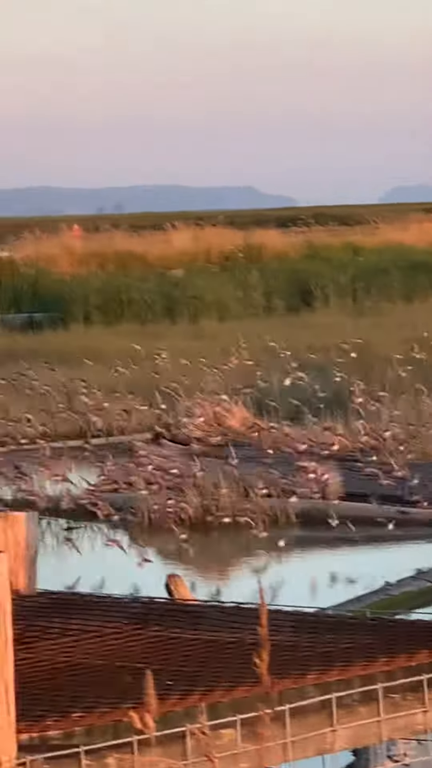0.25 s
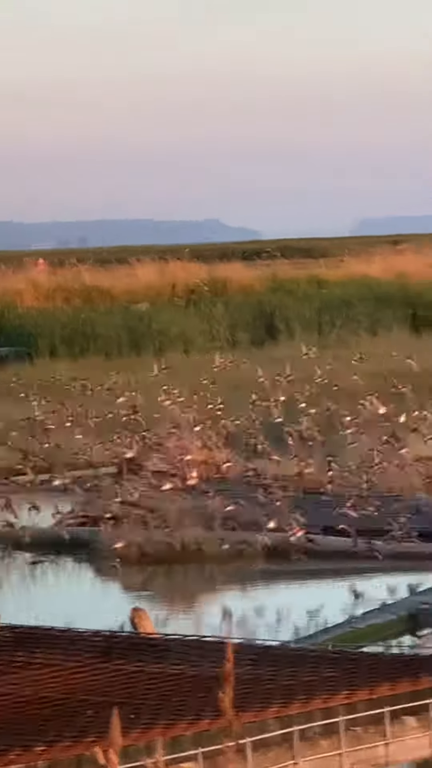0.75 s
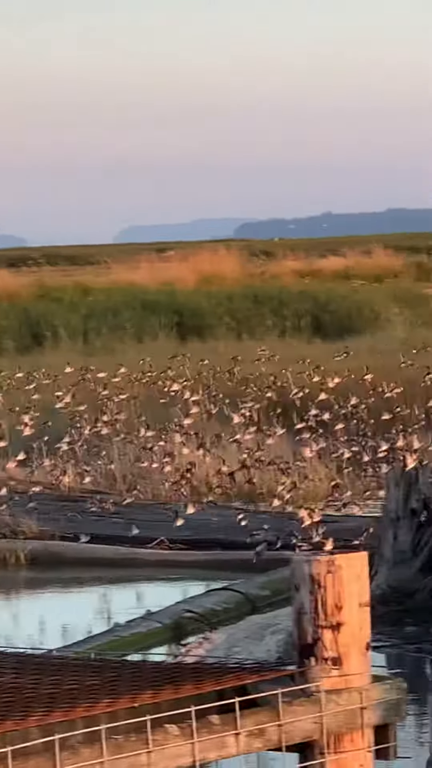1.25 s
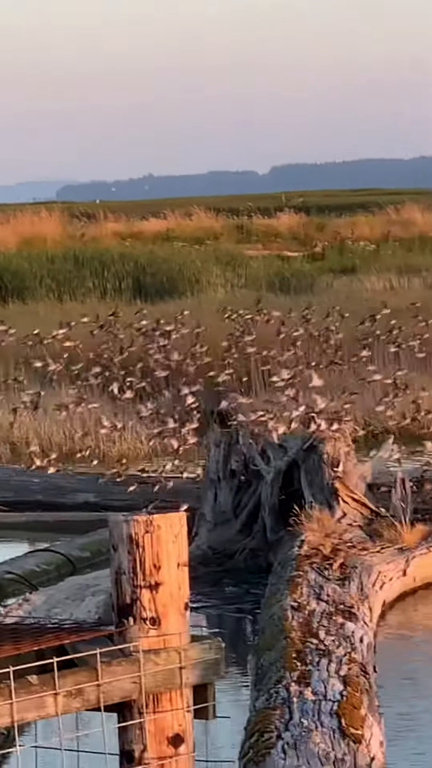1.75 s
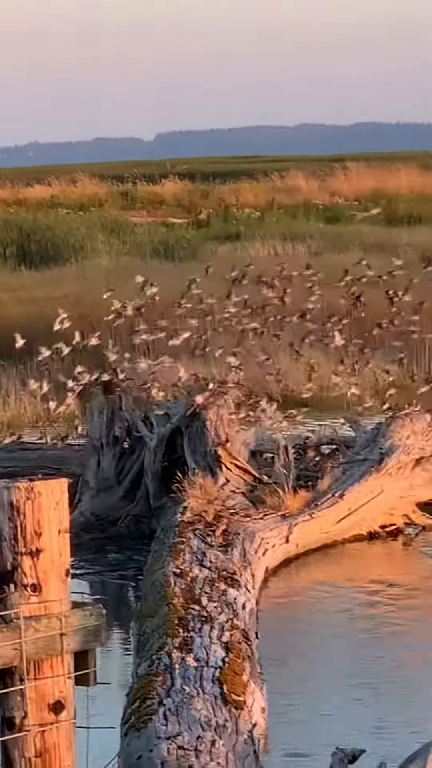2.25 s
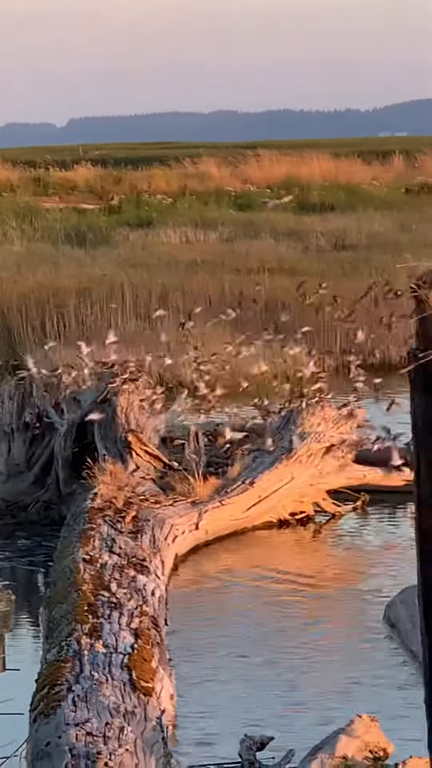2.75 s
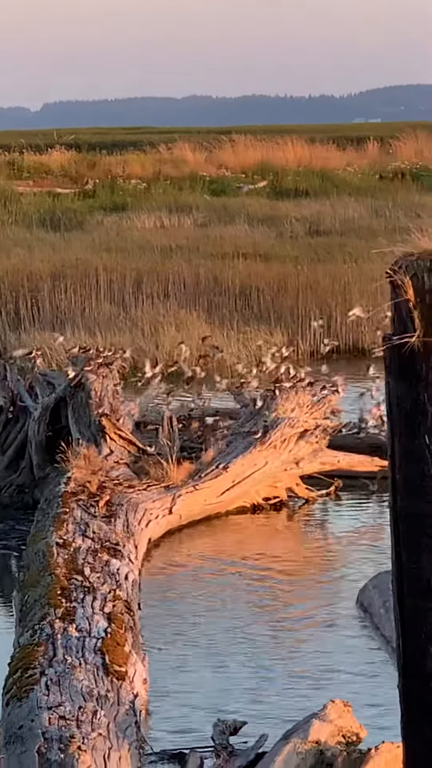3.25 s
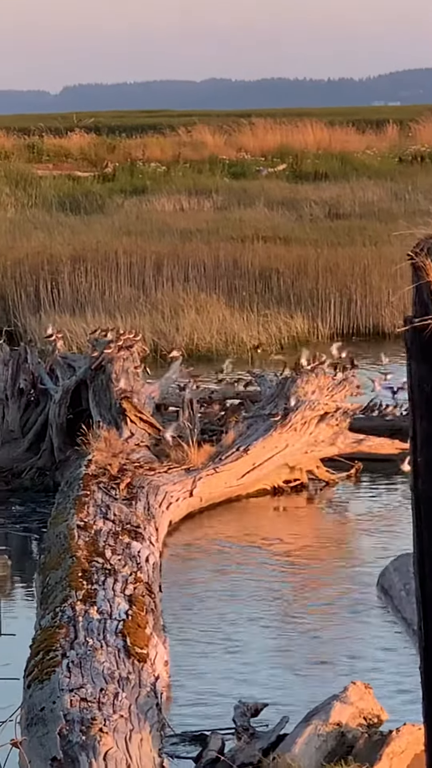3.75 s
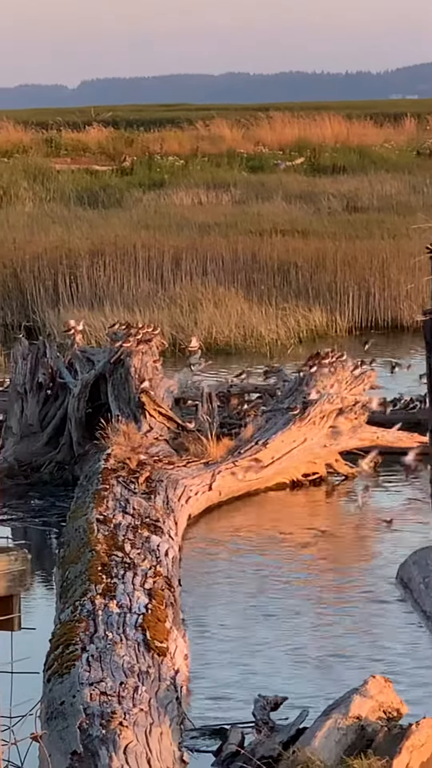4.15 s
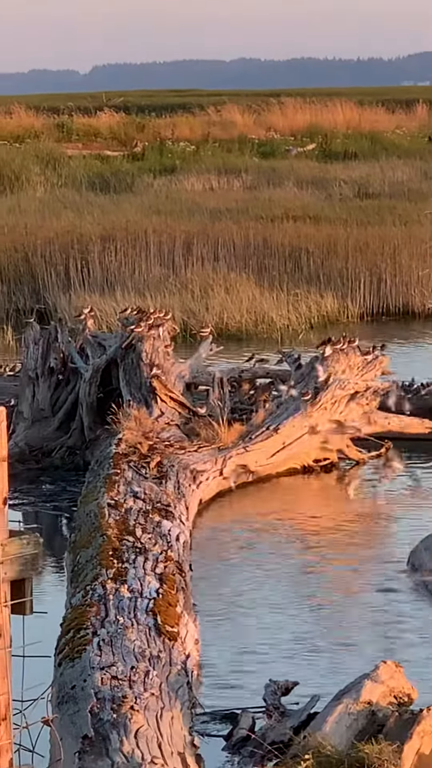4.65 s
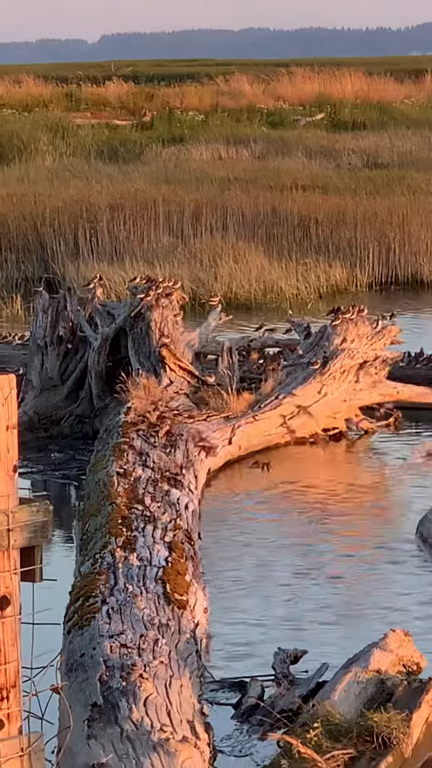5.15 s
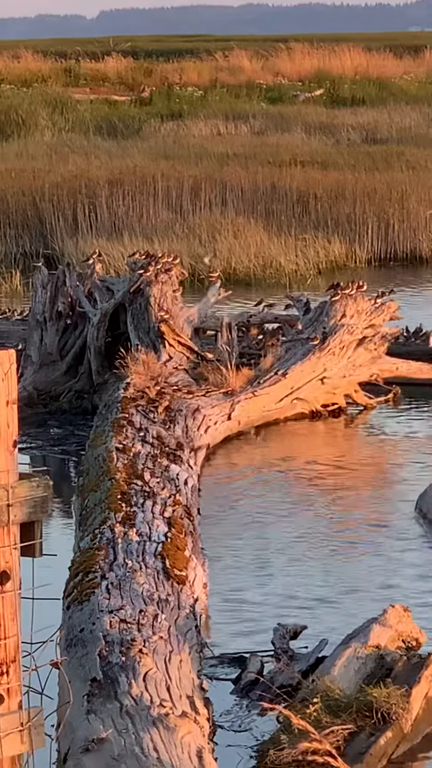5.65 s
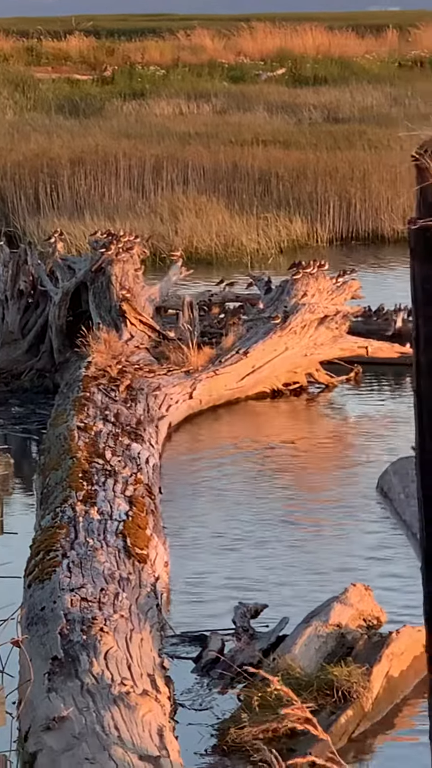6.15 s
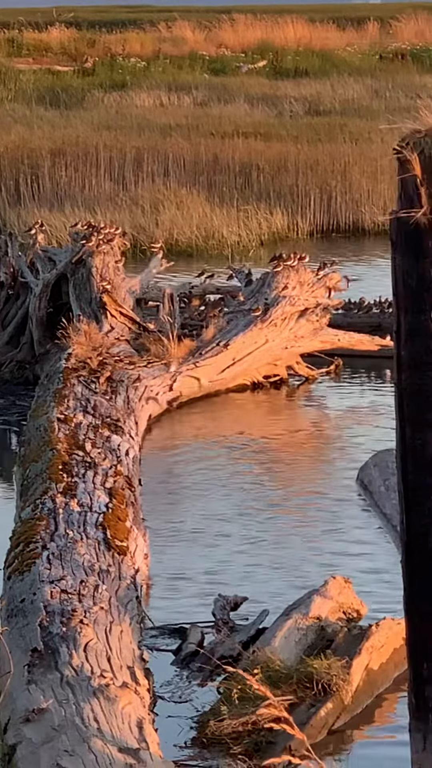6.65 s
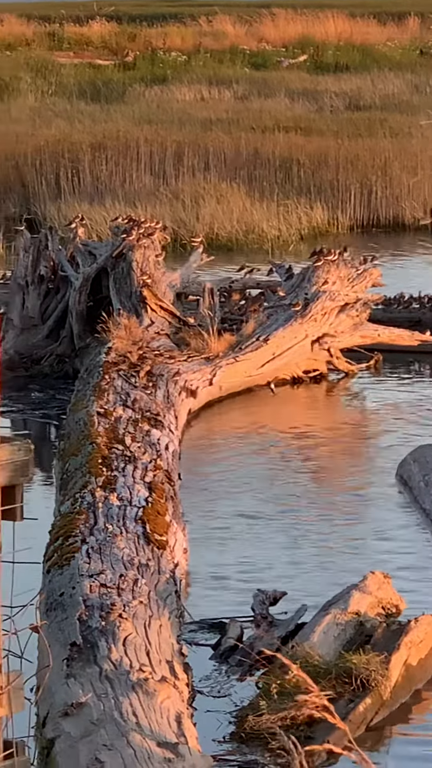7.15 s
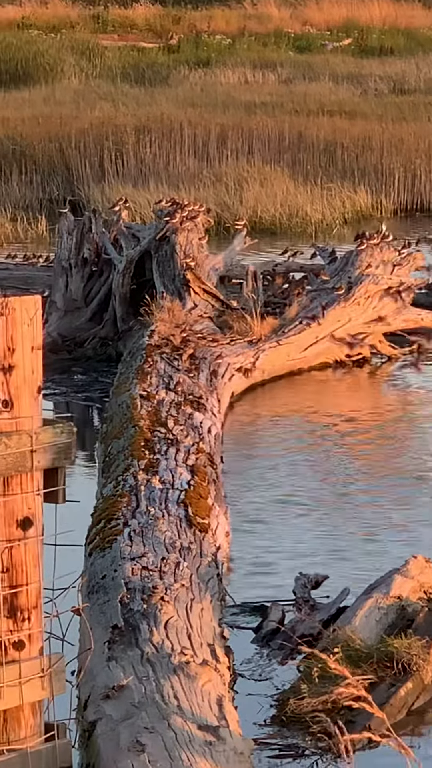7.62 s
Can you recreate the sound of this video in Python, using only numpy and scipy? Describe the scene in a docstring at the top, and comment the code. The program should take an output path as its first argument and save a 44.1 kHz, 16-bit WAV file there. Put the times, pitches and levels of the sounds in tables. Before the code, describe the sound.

A gust thumps the microphone, then low wind rumbles under the thin, high piping and soft wing swish of a large shorebird flock at a marsh pond. Closer birds whistle, rasp and rattle, with a few faint knocks. After a second gust the chatter grows busiest, drops to a brief lull, then swells again as more wind bumps the microphone.

```python
"""At a marsh pond, a two-port microphone hears a flock of small shorebirds from one side. A gust thumps
the microphone at once; wind rumbles and far air hisses under the thin piping and wing swish of the flock.
From 1 s near birds whistle, rasp, purr and rattle, with a few close knocks and a faint, far roar.
A second gust hits at 3 s. Wheeling and settling on driftwood, the flock is busiest from 3.6 to 5 s,
lulls just after 6 s, then swells again as more eddies thump the microphone."""
import sys
import numpy as np
from scipy import signal
from scipy.fft import rfft, irfft, next_fast_len
from scipy.io import wavfile
from scipy.ndimage import uniform_filter1d

SR = 44100
rng = np.random.default_rng(int(sys.argv[2]) if len(sys.argv) > 2 else 0)


def waveform_to_disk(signal):
    """Save audio, clipped to [-1, 1], as 16-bit WAV at the path in sys.argv[1]."""
    frames = np.transpose(np.atleast_2d(signal))
    scaled = np.clip(frames, -1, 1) * 32767
    samples = np.round(scaled).astype(np.int16)
    wavfile.write(sys.argv[1], SR, samples)


N = 347640


def gain_of(db):
    """Decibels to amplitude."""
    return 10 ** (np.asarray(db) / 20)


def unit_rms(x):
    """Scales to rms 1."""
    return x / np.sqrt(np.mean(x ** 2) + 1e-20)


def at_frequency(points, hz):
    """Reads a spectrum on a log frequency axis."""
    f, value = np.transpose(points)
    return np.interp(np.log(hz + 1), np.log(f + 1), value)


def envelope(rows, column=1):
    """Gain over time from one dB column of a curve."""
    rows = np.array(rows)
    return gain_of(np.interp(np.arange(N) / SR, rows[:, 0], rows[:, column]))


def surges(rows, rise_s, fall_s):
    """Gain over time of bursts that build to a peak and die away."""
    t = np.arange(N) / SR
    return sum(gain_of(db) * np.exp(np.minimum((t - s) / rise_s, (s - t) / fall_s)) for s, db in rows)


def wander(samples):
    """A smooth random wobble of rms 1."""
    return unit_rms(uniform_filter1d(uniform_filter1d(rng.standard_normal(N), samples), samples))


def noise(colour, size, patchy_db, likeness=((1, 1), (2, 1))):
    """Two channels of coloured noise with drifting louder and softer patches."""
    frames, hz = N // (size // 4) + 5, np.fft.rfftfreq(size, 1 / SR)
    a, b, c, d, patches = rng.standard_normal((frames, len(hz), 5)).T
    patches = unit_rms(uniform_filter1d(uniform_filter1d(patches, size=10, axis=0), size=12, axis=1))
    alike = np.clip(at_frequency(likeness, hz), 0, 1)[:, None]
    left = a + 1j * b
    right = alike * left + np.sqrt(1 - alike ** 2) * (c + 1j * d)
    spectra = np.array([left, right]) * gain_of(at_frequency(colour, hz)[:, None] + patchy_db * patches)
    return unit_rms(signal.istft(spectra, nperseg=size, noverlap=size - size // 4)[1][:, :N])


def whistles(s, length, start, middle, end, db, burr_hz,
             burr_rate_hz=150, throb=0.13, snap=6, hold=3, flat=2):
    """Each call is a sine on a bent pitch path; a wandering burr shakes its pitch and level."""
    s, length, start, middle, end, db, burr_hz, throb, hold = (
        np.c_[v * np.ones(len(s))] for v in (s, length, start, middle, end, db, burr_hz, throb, hold))
    n = np.arange(int(length.max() * SR) + 1)
    u = np.minimum(n / SR / length, 1)  # progress through the call
    path = middle + (end - start) * (u - .5) + ((start + end) / 2 - middle) * abs(2 * u - 1) ** flat
    draw = rng.random((len(s), 4))
    beat = 2 * np.pi * burr_rate_hz * (1 + .8 * draw[:, :1]) * n / SR
    shake = np.sin(beat + 2 * np.pi * draw[:, 1:2]) + np.sin(0.435 * beat + 2 * np.pi * draw[:, 2:3])
    swell = np.minimum(snap * u, 1) * (1 - u ** hold) * (1 + throb * shake)
    phase = 2 * np.pi * np.cumsum(path + burr_hz * shake, axis=1) / SR
    tone = np.sqrt(2) * gain_of(db) * swell * np.sin(phase)
    at = np.clip((s * SR).astype(int) + n, 0, N)
    return np.bincount(at.ravel(), tone.ravel(), N + 1)[:N]


def blips(rows, cycles, sink):
    """Short pushes of a few cycles whose pitch sinks by the factor exp(sink)."""
    out = np.zeros(N + SR)
    for s, db, hz in rows:
        u = np.arange(0, 1, hz * 2 * np.sinh(sink / 2) / sink / cycles / SR)
        turns = cycles * (1 - np.exp(-sink * u)) / (1 - np.exp(-sink))
        swell = gain_of(db) * np.sin(np.pi * u ** 0.8) ** 2
        out[round(s * SR):][:len(u)] += swell * np.sin(2 * np.pi * turns)
    return out[:N]


# Wind on the microphone between gusts: (time [s], level [dB])
WIND_LEVEL = [(0.0, -45), (0.48, -39), (0.88, -47), (0.96, -52), (1.1, -43), (1.38, -45), (1.76, -40.5),
              (2.45, -44), (2.95, -40), (3.25, -45.5), (3.55, -43), (4.83, -43), (5.3, -42.5),
              (6.78, -44.5), (7.2, -39), (7.57, -48.5), (7.88, -44)]
# Gusts at their peaks: (time [s], level [dB])
GUSTS = [(0.09, -33), (3.16, -31.5), (3.47, -44.5), (5.11, -44.5)]
# Spectra of the rumble and of the lumps in strong gusts: (frequency [Hz], relative level [dB])
RUMBLE_COLOUR = [(13, -29), (22, -10), (54, 2), (70, 6.5), (84, -3.5), (99, -7), (328, -40), (450, -51.5),
                 (580, -69), (990, -120)]
BUFFET_COLOUR = [(70, -24.5), (120, 7.5), (300, -15.5), (450, -41), (900, -110)]


def wind():
    """Wind rumbles on the microphone; lumpy buffeting grows with the square of its force."""
    force = envelope(WIND_LEVEL) + surges(GUSTS, rise_s=0.075, fall_s=0.0097)
    full_gust = gain_of(-33.5)
    rumble = noise(RUMBLE_COLOUR, size=4096, patchy_db=1)[0]
    lumps = gain_of(4.5 * wander(700) - 13)
    buffet = noise(BUFFET_COLOUR, size=1024, patchy_db=7)[0] * lumps
    return force * (rumble + buffet * force / full_gust)


# Hiss from far across the marsh: (frequency [Hz], relative level [dB])
AIR_COLOUR = [(300, 9.5), (1300, 1), (2200, 1.5), (2900, 7), (3600, 2.5), (5000, -15.5), (8000, -5.5),
              (10000, -8.5), (12000, -8.5), (15000, -12)]
# How alike distant noise is at the two ports: (frequency [Hz], likeness [0 to 1])
PORT_LIKENESS = [(600, 0.87), (1000, 0.015), (1800, 0.7), (2500, 0.4), (8000, 0.97), (10500, 0.91),
                 (12500, 1), (14200, 0.98)]


def far_air():
    """Distant air hisses steadily."""
    return gain_of(-73) * noise(AIR_COLOUR, size=512, patchy_db=1.8, likeness=PORT_LIKENESS)


# The flock out over the pond: (time [s], piping level [dB], bustle of rasps and wings [dB])
FLOCK_LEVELS = [(0.0, -64.5, -69), (0.33, -69.5, -91), (0.8, -68.5, -77), (0.92, -67, -83.5),
                (1.45, -66.5, -80.5), (1.76, -63.5, -70), (2.25, -61, -70), (3.18, -62.5, -70),
                (3.6, -56.5, -68), (3.99, -58, -70), (4.45, -57, -66.5), (4.67, -63, -75),
                (5.11, -60, -66.5), (5.75, -67, -80.5), (5.9, -68, -80.5), (6.32, -78.5, -88),
                (6.93, -71.5, -84.5), (7.15, -65, -78.5), (7.36, -65.5, -80.5), (7.43, -62.5, -75.5),
                (7.81, -56, -70), (7.88, -60, -76)]
# Strength of its voices by pitch: (pitch [Hz], relative level [dB])
VOICE_COLOUR = [(2750, -3), (3100, -1.5), (3500, -1), (4100, 1), (4700, -3), (4850, -11.5)]
# Its high voices against its low ones: (time [s], tilt [dB/kHz])
VOICE_TILT = [(0, -5), (1.0, -5), (1.9, -1), (2.6, -3), (3.3, -2), (4.5, 0), (5.6, -0.5), (6.9, -4),
              (7.88, 0)]


def flock_voices(gain, count, low_hz, high_hz, burr_hz, burr_rate_hz, extra_s, spread_db):
    """Birds call at random moments, pitches and distances; more join in as the flock gets louder."""
    when, pitch, stretch, bend, drop, near, burr, shy = rng.random((count, 8)).T
    s, hz = when * N / SR, low_hz + (high_hz - low_hz) * pitch
    busiest = gain_of(-62.5)
    busy = np.clip((envelope(FLOCK_LEVELS) / busiest) ** .8, .05, 1)
    joins = np.clip(4 * (busy[(when * N).astype(int)] - shy) + .5, 1e-4, 1)
    db = at_frequency(VOICE_COLOUR, hz) - spread_db * np.log(1 - .97 * near) + 20 * np.log10(joins)
    khz_above_centre = (hz - (low_hz + high_hz) / 2) / 1000
    db += np.interp(s, *np.transpose(VOICE_TILT)) * khz_above_centre
    length = 0.0075 + extra_s * stretch ** 2
    start, end = hz * (.92 + .14 * bend), hz * (1 - .13 * drop)
    calls = whistles(s, length, start, hz, end, db, burr_hz * burr, burr_rate_hz)
    return unit_rms(calls / np.sqrt(busy)) * gain


# A few birds flap up and rasp: (peak time [s], level [dB])
STARTLES = [(1.45, -72.5), (3.37, -71), (5.84, -65)]
# Wing swish over the water: (frequency [Hz], relative level [dB])
WING_COLOUR = [(1000, -8), (2200, 9), (5300, 10), (7000, -2.5), (10000, -7.5), (15000, -24.5)]


def flock():
    """The distant voices and, apart, the wings; high rasping and swish follow the same bustle."""
    bustle = envelope(FLOCK_LEVELS, column=2) + surges(STARTLES, rise_s=0.017, fall_s=0.021)
    piping = flock_voices(envelope(FLOCK_LEVELS), count=5000, low_hz=2717.5, high_hz=4850,
                          burr_hz=112, burr_rate_hz=98.7, extra_s=0.0238, spread_db=2.7)
    rasping = flock_voices(bustle, count=1300, low_hz=5080, high_hz=6600,
                           burr_hz=714, burr_rate_hz=200, extra_s=0.029, spread_db=3.5)
    flurries = gain_of(3 + 0.48 * wander(900))
    swish = noise(WING_COLOUR, size=512, patchy_db=5, likeness=PORT_LIKENESS)
    return piping + gain_of(-12.5) * rasping, swish * flurries * bustle


def marsh_scatter(x, decay_s=0.067):
    """Reeds, logs and water scatter each sound back, differently to each port."""
    t = np.arange(4000) / SR
    taps = rng.standard_normal((2, len(t))) * gain_of(-60 * t / decay_s) * (t > .002)
    return signal.oaconvolve(x[None], taps / np.linalg.norm(taps[0]), axes=1)[:, :N]


# Birds near the microphone:
# (time [s], length [s], middle pitch [Hz], glide [Hz], level [dB], burr depth [Hz])
NEAR_CALLS = [(0.044, 0.012, 3760, -500, -58.5, 30), (0.92, 0.022, 4150, -100, -65, 130),
              (0.948, 0.023, 3590, -390, -59.5, 56), (0.97, 0.083, 3380, 53, -63, 170),
              (1.192, 0.051, 4010, -300, -65.5, 80), (1.55, 0.1, 4060, -99, -63.5, 130),
              (1.733, 0.038, 3980, -600, -61, 170), (1.803, 0.026, 3500, -250, -57.5, 140),
              (1.836, 0.074, 3580, -500, -61, 110), (1.912, 0.061, 3420, -120, -57.5, 62),
              (2.19, 0.085, 4150, -100, -62.5, 220), (2.274, 0.061, 3500, -150, -55.5, 110),
              (2.76, 0.024, 3990, -100, -54, 200), (2.828, 0.053, 4150, 6, -61, 170),
              (3.169, 0.038, 4220, -3, -61.5, 120), (3.747, 0.05, 3580, -52, -55.5, 130),
              (3.787, 0.041, 4050, -800, -53, 160), (4.035, 0.054, 4020, -400, -55, 120),
              (4.29, 0.038, 3940, -300, -55, 129), (4.357, 0.054, 3244, -140, -57.5, 86),
              (4.617, 0.081, 3830, 0, -58.5, 37), (5.01, 0.034, 4080, 0, -56.5, 130),
              (5.082, 0.11, 3740, 168, -60, 48), (5.749, 0.076, 3290, 100, -69, 30),
              (5.774, 0.012, 5180, -400, -52, 30), (5.7755, 0.047, 4560, -400, -45, 30.2),
              (5.817, 0.014, 5850, -500, -59, 30), (5.831, 0.012, 5700, -500, -55.5, 30),
              (5.917, 0.019, 3800, -430, -56, 70), (5.95, 0.076, 3670, 98, -59, 63.4),
              (6.019, 0.035, 3850, -150, -58.5, 33), (6.065, 0.018, 3960, -100, -60.5, 30),
              (6.477, 0.015, 4300, 700, -64, 41), (6.492, 0.016, 3500, -900, -57, 40),
              (6.516, 0.072, 3220, -600, -65, 80), (6.607, 0.021, 3500, -100, -66, 60),
              (6.631, 0.016, 3720, 0, -59, 27), (6.649, 0.027, 3730, -150, -59.5, 40),
              (6.68, 0.012, 3630, 4, -63, 50), (6.808, 0.04, 3960, -170, -65, 120),
              (7.057, 0.05, 3950, -450, -65.5, 90), (7.126, 0.095, 3320, -34, -63.5, 110),
              (7.566, 0.049, 3970, -160, -56, 130), (7.72, 0.016, 2870, 4, -50, 60),
              (7.864, 0.013, 3700, -100, -51, 100)]


def near_calls(dive_hz=500):
    """Arched whistles, the quicker the more bent; one that falls by dive_hz starts high and fades early."""
    s, length, hz, glide_hz, db, burr_hz = np.transpose(NEAR_CALLS)
    sag = hz * .07 * np.sqrt(.04 / length)
    evenness = np.clip(1 + glide_hz / dive_hz, 0, 1)
    start, end = hz - sag * evenness - glide_hz / 2, hz - sag + glide_hz / 2
    return whistles(s, length, start, hz, end, db, burr_hz, burr_rate_hz=77,
                    throb=burr_hz / 400, snap=12, hold=2 + 5 * evenness, flat=2.6)


# Eddies right on the microphone: (time [s], level [dB], middle pitch [Hz])
THUMPS = [(0.074, -21.5, 86.8), (0.483, -35.5, 84.5), (0.556, -37, 168), (2.631, -33.5, 75.5),
          (2.772, -28.5, 57.5), (2.838, -36, 98), (2.906, -49.5, 183), (3.082, -31, 66), (3.128, -25, 64.6),
          (3.432, -38.5, 99), (4.602, -31, 127), (4.667, -33, 90), (7.134, -22.5, 58.6),
          (7.139, -35.5, 152), (7.204, -35, 154), (7.247, -33.5, 82), (7.319, -38, 94), (7.418, -36.5, 96),
          (7.636, -37, 108)]


def wind_thumps():
    """Each eddy gives the microphone a low push that sinks steeply in pitch."""
    return blips(THUMPS, cycles=2.8, sink=1.8)


# Hoarse birds nearby: (time [s], length [s], centre pitch [Hz], spread [Hz], level per tone [dB])
RASPS = [(0.813, 0.092, 6200, 445, -81.5), (1.159, 0.077, 4770, 452, -72), (1.421, 0.071, 6000, 444, -77.5),
         (3.345, 0.052, 3850, 456, -58.5), (2.187, 0.11, 5840, 295, -67.5), (4.421, 0.047, 5600, 388, -65),
         (5.825, 0.044, 3900, 758, -60), (6.174, 0.072, 4180, 626, -72), (6.315, 0.06, 4230, 790, -67.5),
         (6.767, 0.08, 4420, 508, -67)]


def rasps():
    """A rasp is a tangle of three tones, each zigzagging fast around its own falling pitch."""
    s, length, hz, spread_hz, db = np.transpose(RASPS)
    return sum(whistles(s, length, 1.04 * pitch, pitch, .86 * pitch, db,
                        burr_hz=0.24 * spread_hz, burr_rate_hz=90, throb=0.4)
               for pitch in (hz - spread_hz, hz, hz + spread_hz))


# Near notes pitched below the flock: (time [s], level [dB], pitch [Hz])
LOW_NOTES = [(1.0544, -58.5, 2120), (1.4336, -59, 2170), (7.4944, -56, 2120), (7.7298, -55, 2230)]


def low_notes():
    """Very short burry whistles with no glide."""
    s, db, hz = np.transpose(LOW_NOTES)
    return whistles(s, 0.014, hz, hz, hz, db, burr_hz=130)


# A dull roar a long way off: (time [s], level [dB])
ROAR_LEVEL = [(0.0, -100), (1.47, -79.5), (2.5, -78), (3.31, -97), (3.56, -75.5), (6.23, -77.5),
              (7.46, -94)]


def far_roar():
    """A faint band of low-middle noise swells and fades twice."""
    colour = [(250, -4), (450, -0.5), (1050, -1), (1300, -23.5)]  # (frequency [Hz], relative level [dB])
    return noise(colour, size=1024, patchy_db=2.5, likeness=PORT_LIKENESS) * envelope(ROAR_LEVEL)


# Held notes low in the flock: (time [s], length [s], pitch [Hz], top syllable level [dB])
PURRS = [(1.6, 1.05, 2820, -62), (1.98, 0.2, 3330, -61.5)]


def purrs(gap_s=.013):
    """A purr is a stutter of short overlapping syllables."""
    out = np.zeros(N)
    for onset, length, hz, db in PURRS:
        s = np.arange(onset, onset + length, gap_s)
        late, detune, softer = rng.random((len(s), 3)).T
        pitch = hz * (.98 + .04 * detune)
        out += whistles(s + gap_s * late, 2 * gap_s, pitch, pitch, pitch, db - 8 * softer, burr_hz=40)
    return out


def rattle(onset_s=1.626, gap_s=.0938, count=7, climb_hz_per_s=590, peak_s=1.83):
    """One near bird chips evenly, swelling once; a burry lower note with a faint partner follows each."""
    s = onset_s + gap_s * np.arange(count)
    swell_db = 3 * np.exp(-((s - peak_s) / 0.15) ** 2)
    jitter, accent = rng.standard_normal((count, 2)).T
    start_hz = 8300 + climb_hz_per_s * (s - onset_s)
    chips = whistles(s, 0.016, start_hz, 7300, 6900, -74.5 + swell_db + jitter,
                     burr_hz=200, burr_rate_hz=250, throb=.4)
    s, db = s + .005 * jitter, -66.5 + swell_db + 2.5 * accent
    lower = whistles(s + 0.033, 0.026, 5600, 5300, 4800, db, burr_hz=500, burr_rate_hz=330, snap=12)
    partner = whistles(s + 0.03, 0.035, 7300, 7100, 6800, db - 8, burr_hz=350, burr_rate_hz=280)
    return chips + lower + partner


# Small knocks close by: (time [s], direct level [dB], middle pitch [Hz])
KNOCKS = [(1.95, -56, 760), (2.031, -58, 560), (2.268, -52, 720), (6.343, -56.5, 860)]


def knocks():
    """Each knock is a few sinking cycles, scattered back strongly by the marsh."""
    direct = blips(KNOCKS, cycles=3.5, sink=0.5)
    return direct + gain_of(3.5) * marsh_scatter(direct)


def scene():
    """Far and near birds with their scatter, the marsh around them, and wind on the microphone."""
    far, wings = flock()
    near = near_calls() + purrs() + low_notes() + rattle() + rasps()
    scatter = marsh_scatter(gain_of(-6.5) * far + gain_of(-13) * near)
    birds = far + wings + near + scatter
    return birds + far_roar() + far_air() + knocks() + wind() + wind_thumps()


# What the microphone housing adds to the left port's lead: (frequency [Hz], phase [rad])
HOUSING_PHASE = [(0, 0), (650, -.5), (1100, 1.75), (1700, .6), (2300, 1.3), (2800, .55), (3400, -.8),
                 (4300, -1.75), (5800, 0), (7700, .2), (9500, -.9), (11000, 0)]


def record(dry):
    """After a short fade-in the ports shift apart in phase, the bass folds to mono and the band is cut."""
    fade_s, left_lead_s = .012, .0001225
    mono_below_hz, low_cut_hz, high_cut_hz = 640, 46.7, 15750
    size = next_fast_len(N + 4096)
    hz = np.fft.rfftfreq(size, 1 / SR)
    faded = dry * np.minimum(np.arange(N) / SR / fade_s, 1)
    lead = 2 * np.pi * hz * left_lead_s + np.interp(hz, *np.transpose(HOUSING_PHASE))
    left, right = rfft(faded, size) * np.exp([.5j * lead, -.5j * lead])
    mid = (left + right) / 2
    side = (left - right) / 2 / (1 + (mono_below_hz / (hz + 1)) ** 6)
    ports = irfft(np.array([mid + side, mid - side]), size)[:, :N]
    ports = signal.sosfilt(signal.butter(2, low_cut_hz, "high", fs=SR, output="sos"), ports)
    high_cut = signal.firwin(511, high_cut_hz, window=("kaiser", 9), fs=SR)
    return signal.oaconvolve(ports, high_cut[None], "same")


dry = scene()
out = record(dry)
waveform_to_disk(out)
```